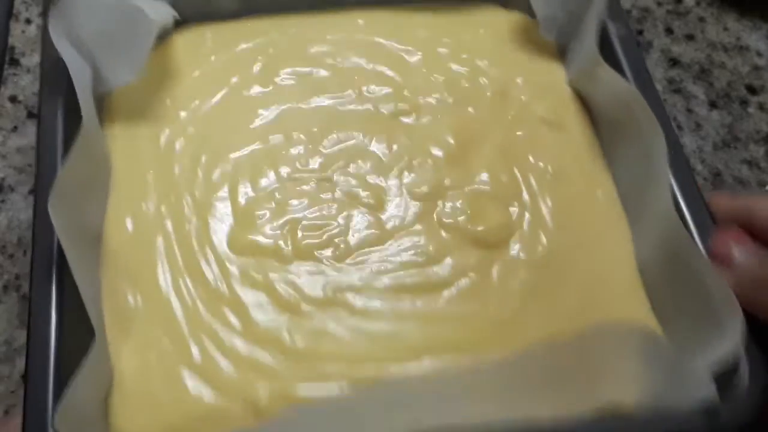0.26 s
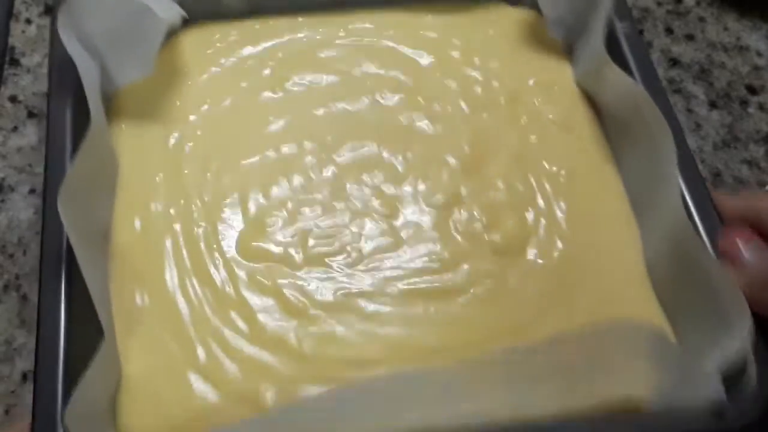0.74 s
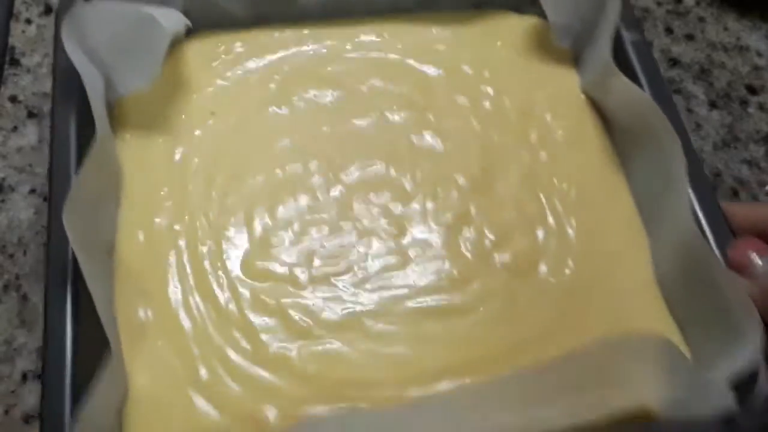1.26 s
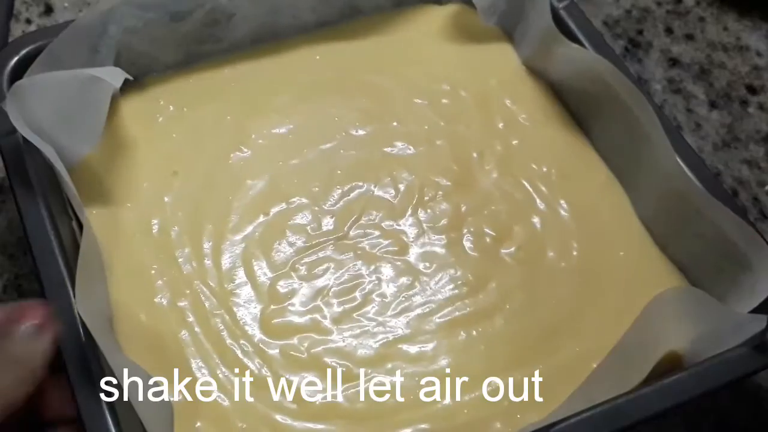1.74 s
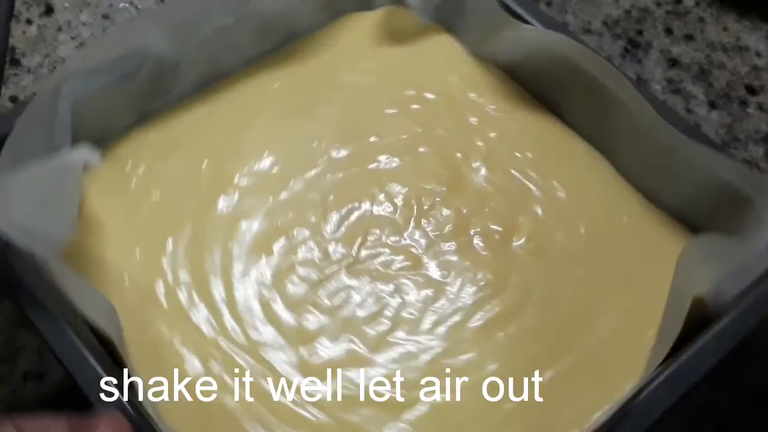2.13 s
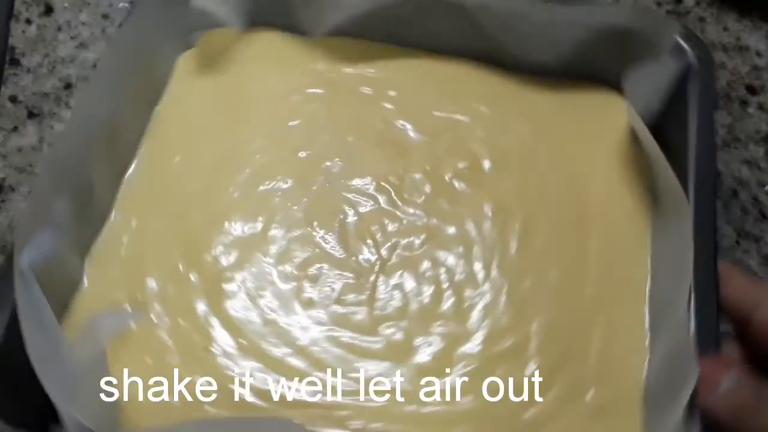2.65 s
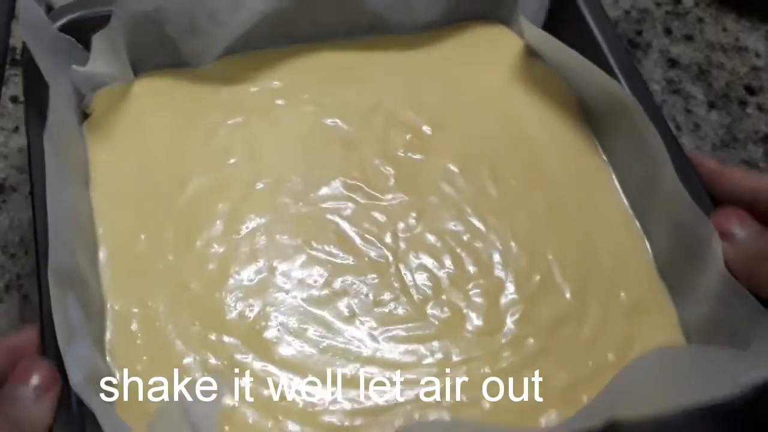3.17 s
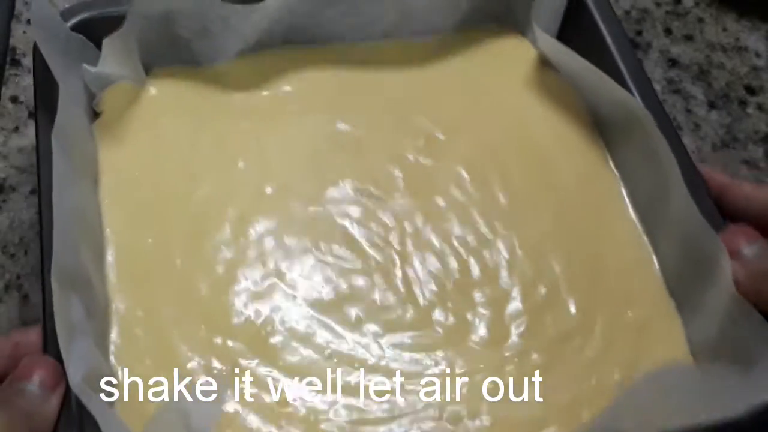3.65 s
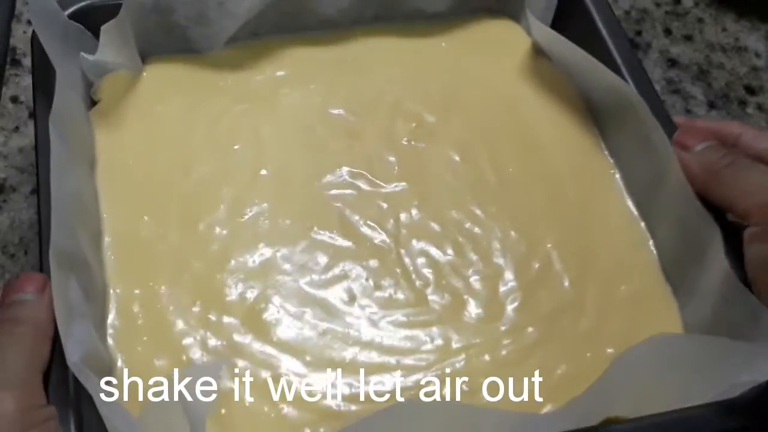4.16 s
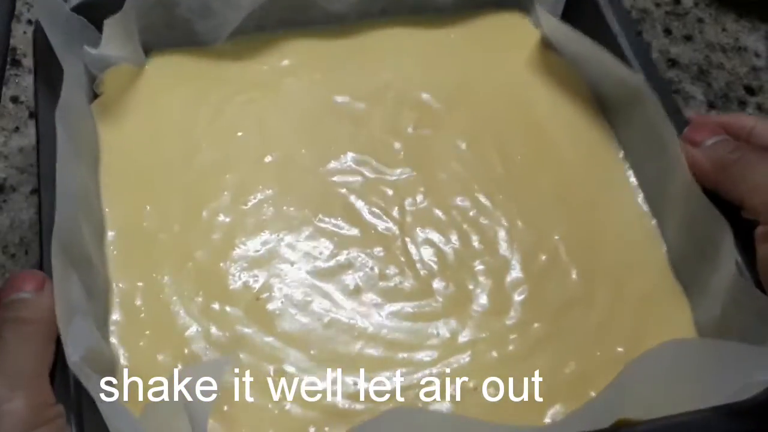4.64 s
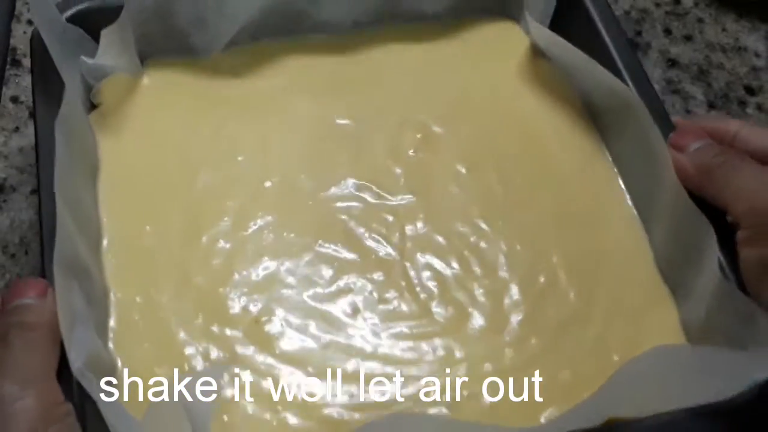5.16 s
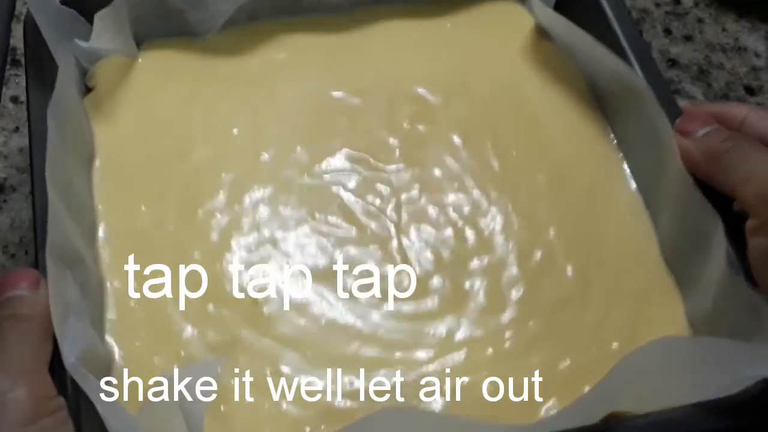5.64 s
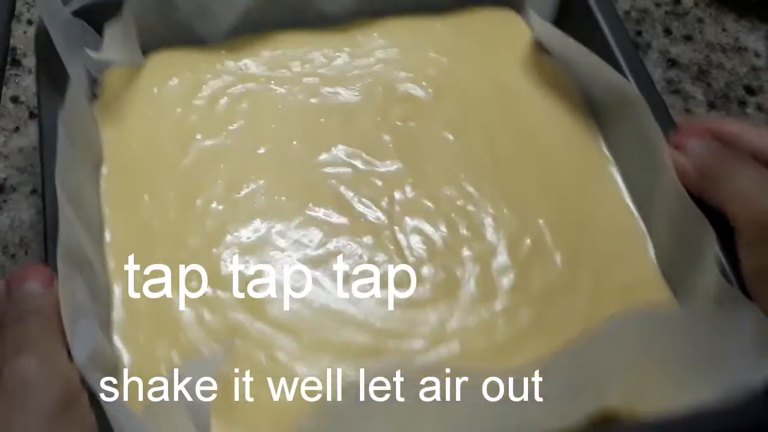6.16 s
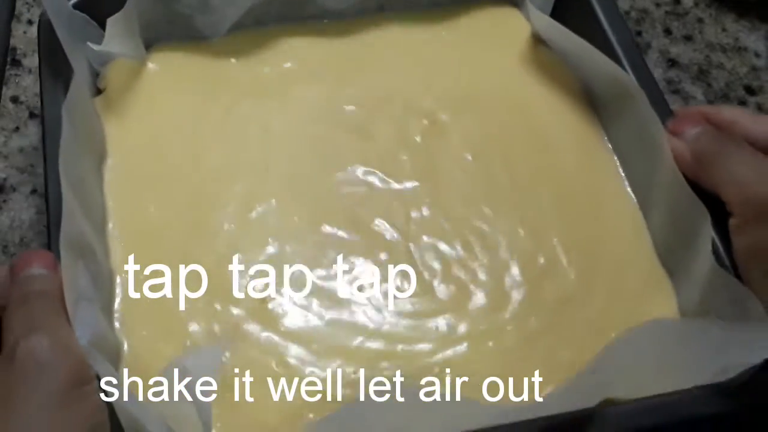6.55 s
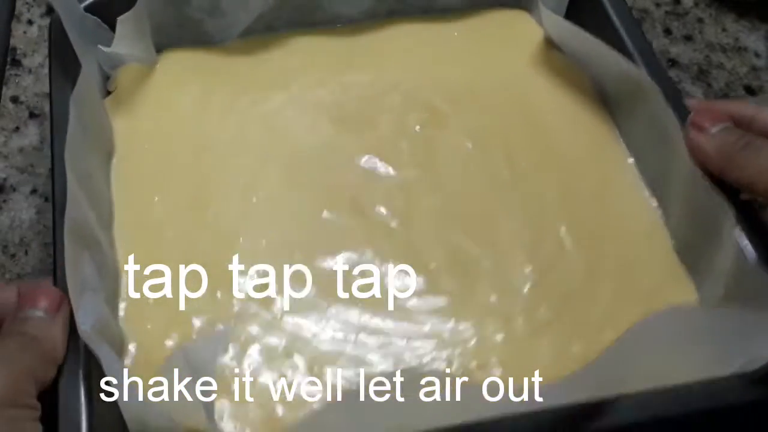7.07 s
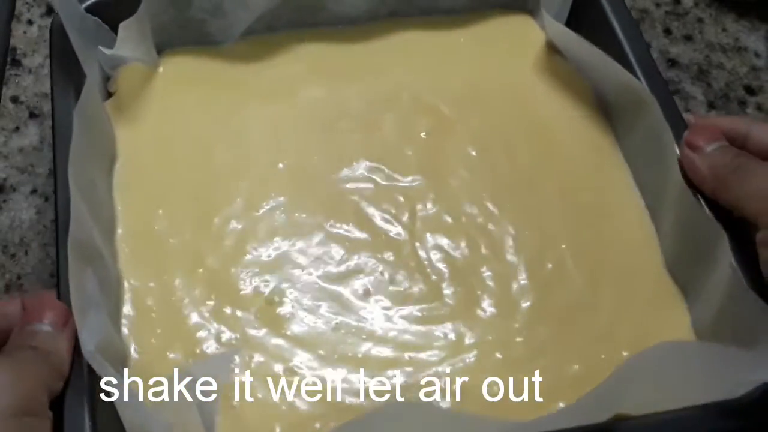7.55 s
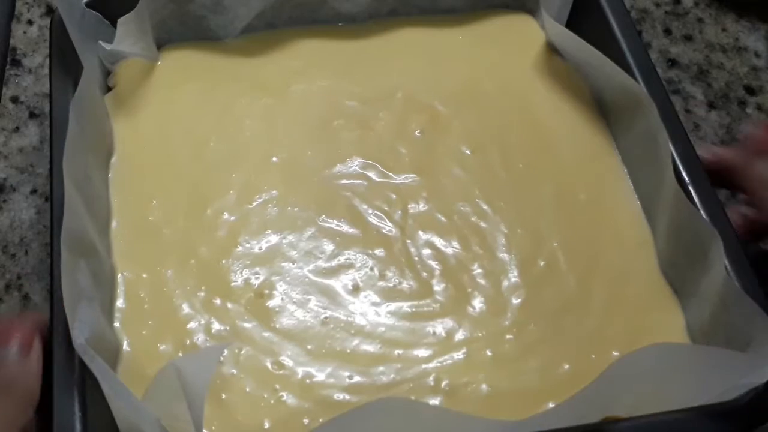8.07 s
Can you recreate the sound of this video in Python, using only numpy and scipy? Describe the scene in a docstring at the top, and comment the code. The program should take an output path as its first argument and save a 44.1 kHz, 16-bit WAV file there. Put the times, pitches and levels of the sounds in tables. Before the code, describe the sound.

A faint appliance hum and low room noise run throughout in a small kitchen. For the first 1.5 seconds, the paper liner of a batter-filled metal baking tin rustles softly with crisp little ticks, along with a few low hand bumps. Between about 1.8 and 2.8 seconds, the tin touches the stone counter very lightly and the hands bump again. More crinkling follows from 3 to 4 seconds. From 4.5 to 5.8 seconds, the tin is rapped on the counter five times, about three a second, much louder than the rustling. Each knock is a sharp, damped metallic clatter, edge first and then flat, with a short room echo. The paper rustles again from about 6.1 to 6.7 seconds. Three more raps land at roughly 7.3, 7.6 and 7.85 seconds, the thin rim ringing briefly, before only the hum remains.

```python
"""An appliance hums in a small kitchen. A metal baking tin, full of batter and lined with paper, is turned
by hand: the liner rustles and ticks, the hands bump softly, and the tin touches a stone counter lightly.
From 4.5 s it is rapped five times, landing edge first, then flat; the batter damps its modes and the room
throws each knock back. The liner rustles again, and after 7 s come three more raps, with the tin held
loosely so that its thin rim rings on."""
import sys
import numpy as np
from scipy import signal
from scipy.fft import rfft, irfft
from scipy.io import wavfile

SR = 44100
rng = np.random.default_rng(int(sys.argv[2]) if len(sys.argv) > 2 else 0)


def to_wav(sig):
    """Store sig (one row per channel, or 1-D mono) as 16-bit WAV at the path in sys.argv[1].

    Samples outside -1..1 are clipped; the rate is SR.
    """
    pcm = np.clip(np.atleast_2d(sig), -1, 1) * 32767
    pcm = np.round(pcm).astype(np.int16)
    wavfile.write(sys.argv[1], SR, pcm.T)  # frames by channels


N = 366471

# The spectrum of a snapping crease. Each row: frequency in Hz, spectral level in dB.
CREASE_SPECTRUM = [(200, 0.5), (700, -3.5), (1500, 0), (2500, 0), (4500, -2.5), (7800, -3.5), (10000, -1.5),
                   (16000, -18)]


def amp(db):
    """Decibels to amplitude ratio."""
    return 10 ** (np.asarray(db) / 20)


def unit_rms(x):
    """Normalises a signal to rms 1."""
    return x / np.sqrt(np.mean(x ** 2) + 1e-20)


def burst(x):
    """Normalises a transient to the energy of 20 ms at rms 1."""
    return x / np.linalg.norm(x) * np.sqrt(.02 * SR)


def curve_at(points, hz):
    """Interpolates (Hz, value) points on a log-frequency axis."""
    f, value = np.transpose(points)
    return np.interp(np.log(hz + 1), np.log(f + 1), value)


def add(mix, start_s, sound):
    """Superposition: a sound joins the mix at its start time."""
    part = mix[max(round(start_s * SR), 0):][:len(sound)]
    part += sound[:len(part)]


def colour(x, points, size=4096):
    """Minimum-phase filter whose gain follows (Hz, dB) points."""
    log_gain = np.log(amp(curve_at(points, abs(np.fft.fftfreq(size, 1 / SR)))))
    taps = np.fft.ifft(np.exp(signal.hilbert(log_gain).conj())).real
    return signal.oaconvolve(x, taps[:size // 2])[:len(x)]


def dying_noise(t, t60):
    """Modal overlap: a dense ring behaves as noise that falls 60 dB in t60 seconds."""
    return rng.standard_normal(len(t)) * amp(-60 * t / t60)


def air_noise(level_db=-56):
    """Stationary broadband noise: the air of the room, strongest in the bass."""
    # The spectrum of the air. Each row: frequency in Hz, spectral level in dB.
    spectrum = [(20, -18), (60, -17), (92, -13), (130, -13), (210, -3), (320, -14.5), (400, -12.5),
                (500, -11), (700, -15.5), (960, -17.5), (1300, -23), (2100, -20.5), (3500, -31.5),
                (8000, -38.5), (10000, -34.5), (16000, -48)]
    gain = amp(curve_at(spectrum, np.fft.rfftfreq(N, 1 / SR)))
    return amp(level_db) * unit_rms(irfft(rfft(rng.standard_normal(N)) * gain, N))


def appliance_hum(motor_hz=100, motor_db=-59):
    """Narrow resonances driven by noise waver around a steady motor tone."""
    # The appliance's resonances. Each row: centre in Hz, half-width in Hz, rms level in dB.
    resonances = [(94.2, 6.6, -65), (233, 11, -73), (310.4, 15, -58.5), (447.6, 11, -66.5),
                  (478.5, 5.9, -62)]
    hz, t = np.fft.rfftfreq(N, 1 / SR), np.arange(N) / SR
    out = amp(motor_db) * unit_rms(np.sin(2 * np.pi * motor_hz * t))
    for centre, width, db in resonances:
        response = 1 / (1 + ((hz - centre) / width) ** 2)
        out += amp(db) * unit_rms(irfft(rfft(rng.standard_normal(N)) * response, N))
    return out


def slide_envelope(uneven_db=2, catch_s=0.05, rise_s=0.0067, fade_db_per_s=165):
    """Stick-slip friction: each slide rises, holds and fades, uneven as the paper catches and slips."""
    # The liner's slides as the hands shift. Each row: start in seconds, length in seconds, level in dB.
    slides = [(.01, 0.15, -57), (0.176, 0.5, -57), (0.625, 0.67, -56), (1.45, 0.056, -60.5),
              (3.068, 0.36, -67.5), (3.357, 0.39, -55.5), (3.828, 0.086, -57.5), (6.077, 0.56, -58.5),
              (7.01, 0.053, -63.5)]
    t, level = np.arange(N) / SR, np.zeros(N)
    for start, length, db in slides:
        rise = np.clip((t - start) / rise_s, 0, 1)
        level += rise * amp(db - fade_db_per_s * np.maximum(t - start - length, 0))
    catches = rng.standard_normal(512)
    return level * amp(uneven_db * np.interp(t / catch_s, np.arange(len(catches)), catches))


def crease_snap(hz, t60, fold_db=4):
    """Snap-through buckling: a crease gives a short crack with the broad resonance of its fold; peak 1."""
    t = np.arange(SR // 16) / SR
    crack = colour(dying_noise(t, t60), CREASE_SPECTRUM)
    crack = colour(crack, [(hz / 1.1, 0), (hz, fold_db), (hz * 1.1, 0)])
    return crack / abs(crack).max()


def paper_rustle(hiss_db=-8, crinkle_db=5, spread_db=11, crinkle_t60=0.02, cluster_s=.02, clusters=190):
    """Friction makes the sliding liner hiss while small creases buckle in threes, mostly faintly."""
    # The spectrum of sliding paper. Each row: frequency in Hz, spectral level in dB.
    hiss_spectrum = [(200, -11), (700, 2.5), (1500, 3), (2500, 0), (4500, -5.5), (7800, -12), (10000, -2),
                     (13000, -14), (16000, -7)]
    folds = [crease_snap(hz, crinkle_t60) for hz in np.geomspace(1500, 6000, 24)]
    crinkles = np.zeros(N)
    for when, strength, *lags in rng.random((clusters, 5)):
        gain = amp(crinkle_db + spread_db * strength ** 2)
        for lag in lags:
            add(crinkles, when * N / SR + cluster_s * lag, gain * folds[rng.integers(len(folds))])
    crinkles = colour(crinkles, [(2500, 1), (8000, -1.5)])
    envelope = slide_envelope()
    hiss = amp(hiss_db) * unit_rms(colour(rng.standard_normal(N), hiss_spectrum))
    return envelope * (crinkles + hiss)


def kitchen_response(t, delay_s=0.0018, build_s=0.0024):
    """Reverberation: dense reflections of total energy 1 build up, then each band decays at its own rate."""
    # The kitchen's reverberation times. Each row: frequency in Hz, t60 in seconds.
    decay_times = [(100, 0.74), (260, 0.21), (700, 0.44), (1840, 0.39), (4850, 0.33), (12800, 0.31)]
    hz, frame_s, bands = signal.stft(rng.standard_normal(len(t)), SR, nperseg=256)
    fade = amp(-60 * frame_s / curve_at(decay_times, hz)[:, None])
    tail = signal.istft(bands * fade, SR, nperseg=256)[1][:len(t)]
    tail *= np.clip((t - delay_s) / build_s, 0, 1)
    return tail / np.linalg.norm(tail)


def hand_bumps(start_hz=85, end_hz=150, length_s=0.035):
    """A stiffening contact: each soft push lasts a few low cycles and rises in pitch."""
    # The bumps of handling. Each row: start in seconds, level in dB.
    bumps = [(0.073, -38.5), (.091, -33.5), (.317, -44), (2.128, -35.5), (2.239, -40.5), (2.274, -46),
             (6.645, -45)]
    out, hz = np.zeros(N), np.linspace(start_hz, end_hz, round(length_s * SR))
    push = np.sin(2 * np.pi * np.cumsum(hz) / SR)
    for start, db in bumps:
        rub = colour(rng.standard_normal(len(hz)), [(40, 2), (180, 10), (280, -10), (600, -21), (2000, -42)])
        add(out, start, amp(db) * (push + 0.68 * unit_rms(rub)) * np.hanning(len(hz)) ** 2)
    return out


def paper_ticks(gain_db=3, room_db=-5, t60=.018, fold_hz=(2200, 3930)):
    """The loudest creases buckle singly, each followed by faint reverberation."""
    # The liner's ticks. Each row: start in seconds, level in dB, treble gain in dB.
    ticks = [(.173, -30, -1), (0.2518, -31, 3.5), (.754, -37, -3), (0.9002, -36.5, -7),
             (1.0104, -39.5, -0.5), (1.0942, -33, -1.5), (1.1432, -37.5, -6), (1.2613, -36.5, 0),
             (2.243, -39.5, -17), (3.089, -41.5, -8), (3.404, -38.5, -8), (3.5839, -35.5, 1.5),
             (3.624, -34.5, -5), (3.7567, -34, -6), (3.8315, -35.5, -1.5), (6.312, -41.5, 10),
             (6.328, -43, 10), (6.3593, -37.5, -3), (6.4235, -36, -5), (6.604, -42.5, -2.5)]
    out, t = np.zeros(N), np.arange(SR // 3) / SR
    for start, db, treble_db in ticks:
        crack = crease_snap(rng.uniform(*fold_hz), t60)
        echo = colour(kitchen_response(t), CREASE_SPECTRUM)
        tick = amp(room_db) * echo * np.linalg.norm(crack) / np.linalg.norm(echo)
        add(tick, 0, crack)
        add(out, start, amp(gain_db + db) * colour(tick, [(2500, 0), (8000, treble_db)]))
    return out


def hard_blow(t, contact_s=0.0012):
    """Impact: a brief force pulse between metal and stone radiates a click."""
    pulse = (1 - t / contact_s) * np.exp(-t / contact_s)
    return colour(pulse, [(40, -29), (140, -21), (330, 13.5), (1800, 1.5), (4000, 0.5), (16000, -16)])


def tin_modes(t, spot_db=1.5, grip_detune=.004):
    """Damped normal modes: the spot that lands varies their strength, the grip their tuning."""
    # The tin's modes; batter damps the last five least. Each row: frequency in Hz, level in dB, t60 in seconds.
    modes = [(192, -13, .12), (288, -5, .13), (324, -2, .11), (352, -3, .07), (488, -3, .1), (530, -7, .1),
             (625, -4, .1), (685, -8, .12), (940, -9, .09), (1110, -10, .1), (1206, -9, .11),
             (1373, -9, .14), (1778, -11, .13), (2290, -11, .05), (2670, -20, .12), (240, -10, .22),
             (474, -6, .32), (828, -7, .17), (1318, -8, .25), (4870, -31, .2)]
    hz, db, t60 = np.transpose(modes)[:, :, None]
    sign = (-1) ** np.arange(len(modes))[:, None]  # neighbouring modes push the air in opposite directions
    spot, grip = rng.standard_normal((2, len(modes), 1))
    envelopes = amp(db + spot_db * spot - 60 * t / t60)
    tuned_hz = hz * (1 + grip_detune * grip)
    return (sign * envelopes * np.cos(2 * np.pi * tuned_hz * t)).sum(0)


def ring(t, modes):
    """Free vibration: each mode is an exponentially decaying sinusoid."""
    return sum(amp(db - 60 * t / t60) * np.sin(2 * np.pi * hz * t) for hz, db, t60 in modes)


def landing(knock, thud_db, hardness_db):
    """Contact time sets bandwidth: a hard landing is brief and bright; a flat one makes the bottom thud."""
    clang_db, tick_db = 0.29 * hardness_db, 0.79 * hardness_db  # of the walls and of the rim
    return colour(knock, [(320, thud_db), (520, 0.013), (1200, clang_db), (2800, hardness_db), (6500, tick_db)])


def tin_knocks(modes_db=-2, clatter_db=-3, room_db=-5, blow_db=-6, panel_db=6, sheet_t60=0.042, loose_s=7):
    """Impulse excitation: each contact sets the tin, the counter and the room vibrating at once."""
    # Contacts of tin and counter. Each row: start in seconds, level in dB, thud of the bottom in dB,
    # hardness in dB, resonance of the struck panel in Hz.
    contacts = [(1.846, -48.5, 0, 15.5, 2480), (1.859, -47, -2, 11.5, 560), (2.4062, -58.5, -5, 20.5, 3170),
                (2.7563, -65.5, -10, 24.5, 1950), (4.4878, -12, -7.5, -6.5, 845),
                (4.4955, -13.5, -0.5, 3, 604), (4.8493, -19, -21.5, -13.5, 644),
                (4.8683, -25.5, 0, 1.5, 1200), (4.876, -19.5, -6, 2, 540), (5.1969, -17, -12.5, -12.5, 564),
                (5.2058, -20.5, 3, 7.5, 600), (5.2071, -22, -4, 13, 2800), (5.219, -19, -9.5, 3.5, 1260),
                (5.536, -13.5, -1.5, -2, 246), (5.548, -20.5, -10, -7.5, 460), (5.796, -28.5, -8, -3, 1400),
                (5.8036, -15.5, -3, 6, 800), (5.809, -18, -1, 7.5, 1770), (7.146, -42, -4, -43, 494),
                (7.294, -35, 4, -2, 453), (7.3043, -13.5, -2, -1, 314), (7.547, -37.5, -6, -25, 460),
                (7.6155, -17, -1, -0.5, 326), (7.847, -21.5, 3, 5, 344), (7.854, -22.5, -0.5, -8.5, 820)]
    # The dense ring of the sheet metal. Each row: frequency in Hz, spectral level in dB.
    sheet_spectrum = [(25, -36.5), (60, -9.5), (115, -6.5), (200, 1), (330, 10), (600, 3.5), (1000, -0.5),
                      (1400, 1.5), (2400, -6.5), (3300, -14.5), (5300, -16), (7800, -22), (9800, -16.5),
                      (16000, -33)]
    # The boom of counter and kitchen, and the thin rim's modes.
    # Each row: frequency in Hz, level in dB, t60 in seconds.
    boom_modes = [(96.3, -29, .6)]
    rim_modes = [(2230, -14.5, 0.059), (2730, -19, 0.13), (4860, -28, 0.29), (5050, -34, 0.25),
                 (5400, -26, 0.17)]
    out, t = np.zeros(N), np.arange(SR // 2) / SR
    blow = amp(blow_db) * burst(hard_blow(t))
    for start, level_db, thud_db, hardness_db, panel_hz in contacts:
        body = amp(modes_db) * burst(tin_modes(t))
        clatter = amp(clatter_db) * burst(colour(dying_noise(t, sheet_t60), sheet_spectrum))
        echo = amp(room_db) * burst(colour(kitchen_response(t), sheet_spectrum))
        knock = body + clatter + echo - blow + ring(t, boom_modes)
        if start > loose_s:  # a loose grip lets the rim ring on
            knock += ring(t, rim_modes)
        panel = [(panel_hz / 1.26, 0), (panel_hz, panel_db), (panel_hz * 1.32, 0)]
        add(out, start, amp(level_db) * colour(landing(knock, thud_db, hardness_db), panel))
    return out


def scene(rustle_room_db=-3):
    """Superposition of tin, paper and hands in the humming kitchen, in one channel."""
    rustle = paper_rustle()
    room = kitchen_response(np.arange(SR // 2) / SR)
    echo = amp(rustle_room_db) * signal.oaconvolve(rustle, room)[:N]
    return (tin_knocks() + paper_ticks() + rustle + echo + hand_bumps() + air_noise() + appliance_hum())[None]


def record(dry, low_hz=24, high_hz=16250):
    """Band limiting and soft saturation: a small microphone drops the extremes and rounds off peaks."""
    thin = signal.sosfilt(signal.butter(2, low_hz, "high", fs=SR, output="sos"), dry)
    rounded = thin / (1 + thin ** 6) ** (1 / 6)
    lowpass = signal.firwin(255, high_hz, window=("kaiser", 8), fs=SR)
    return signal.oaconvolve(rounded, lowpass[None], "same", axes=1)


dry = scene()
out = record(dry)
to_wav(out)
```